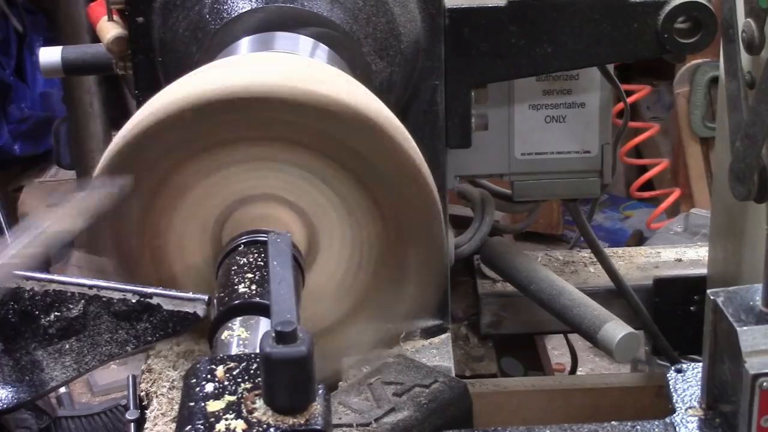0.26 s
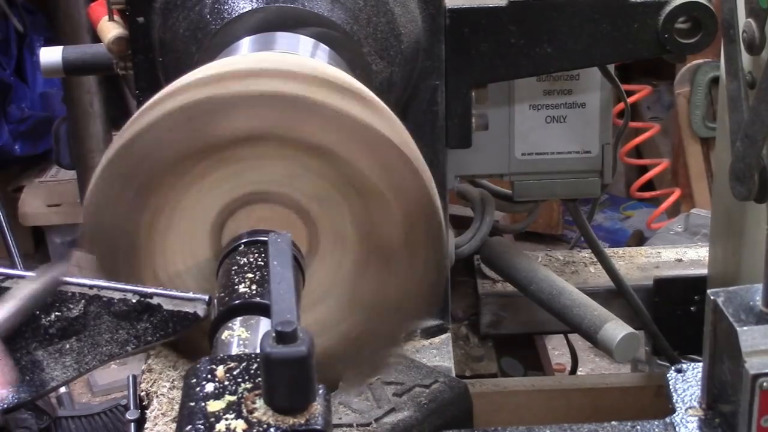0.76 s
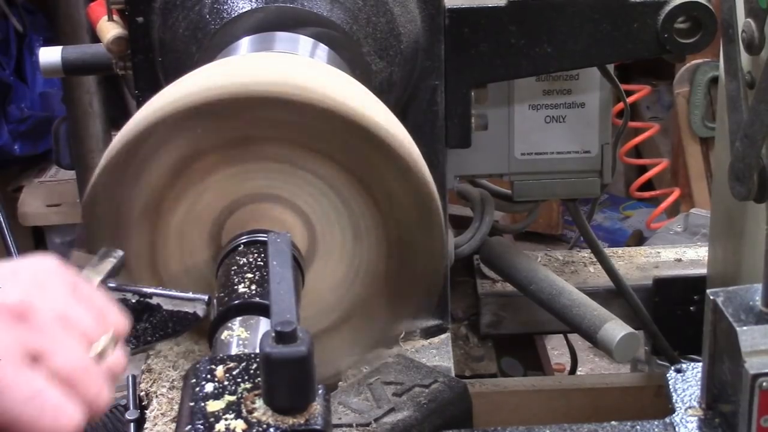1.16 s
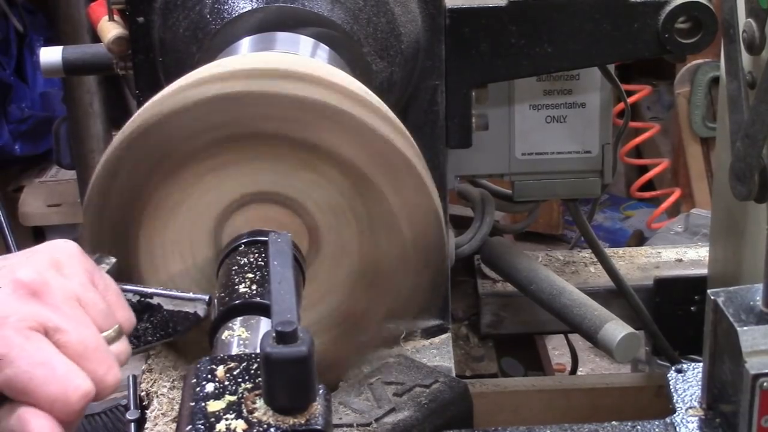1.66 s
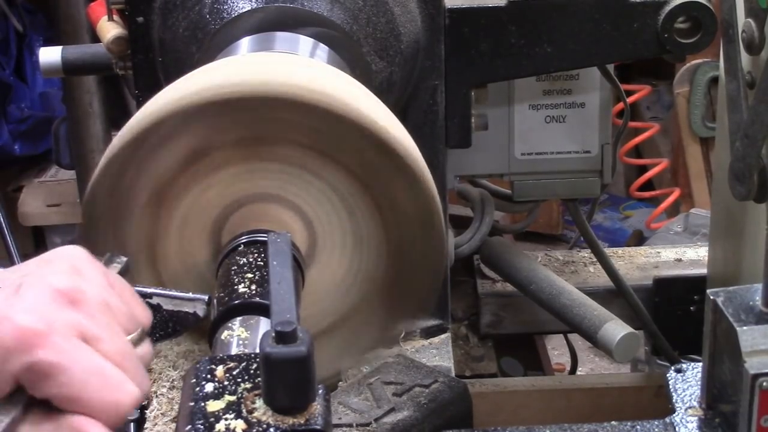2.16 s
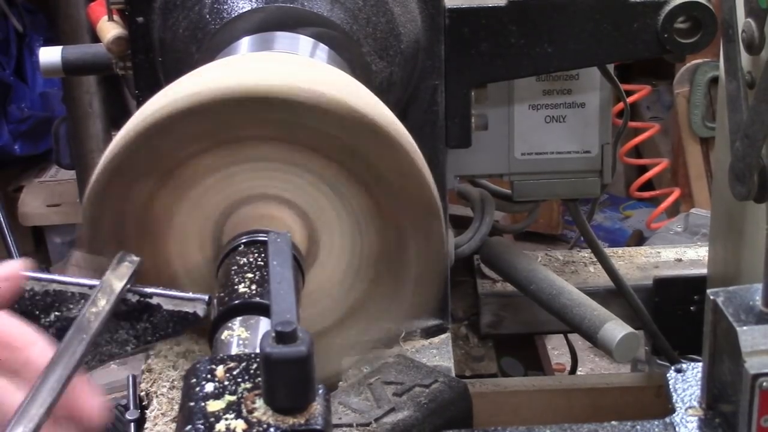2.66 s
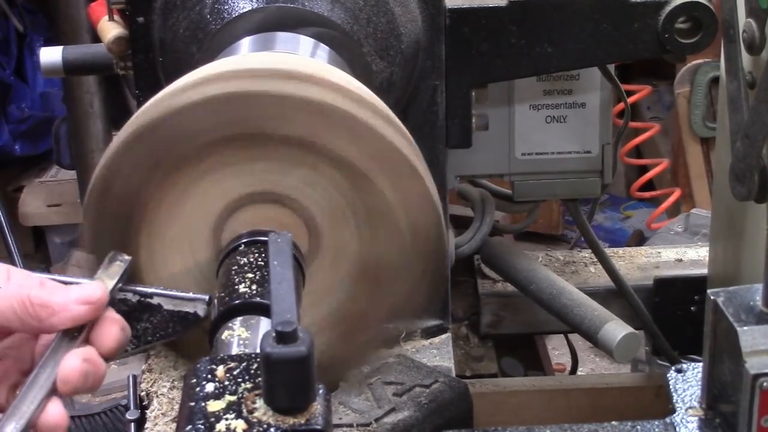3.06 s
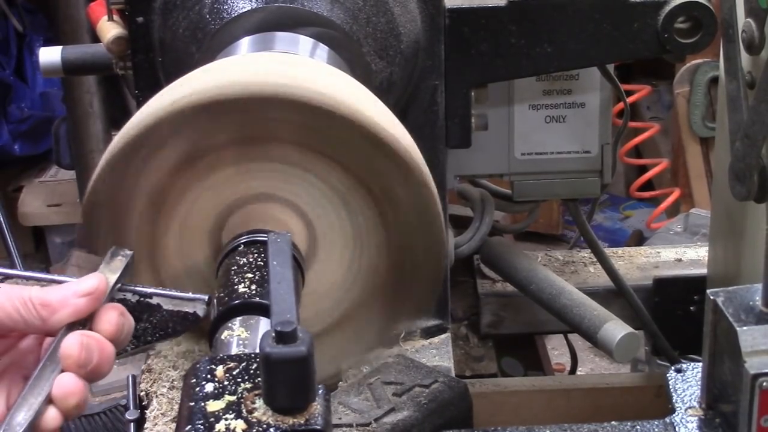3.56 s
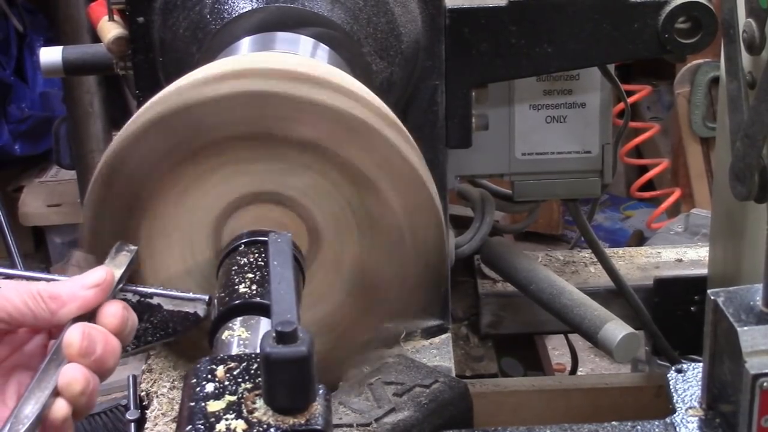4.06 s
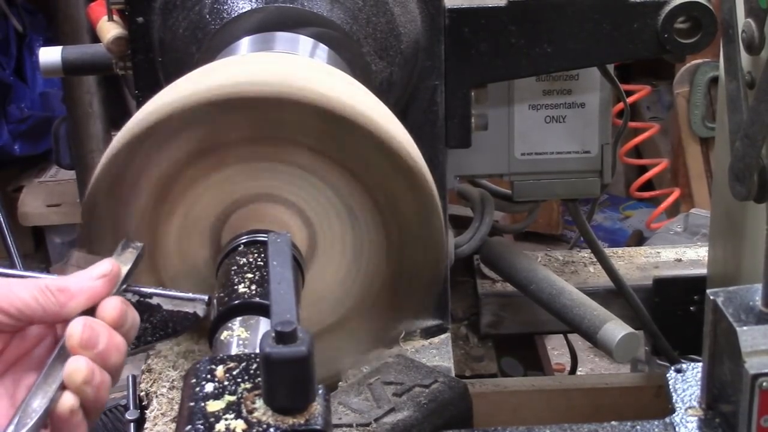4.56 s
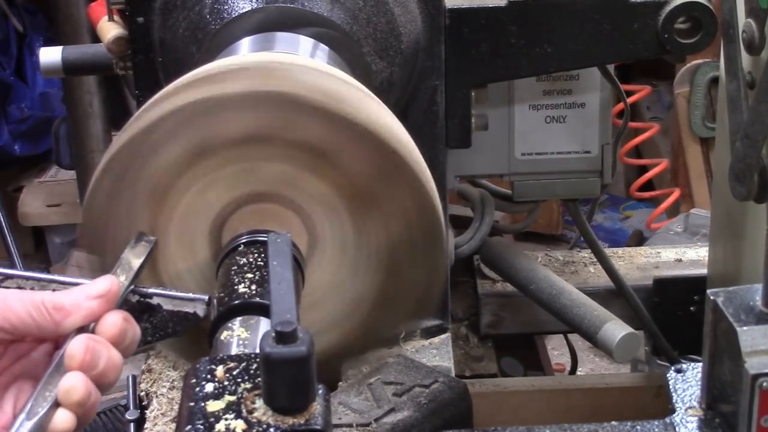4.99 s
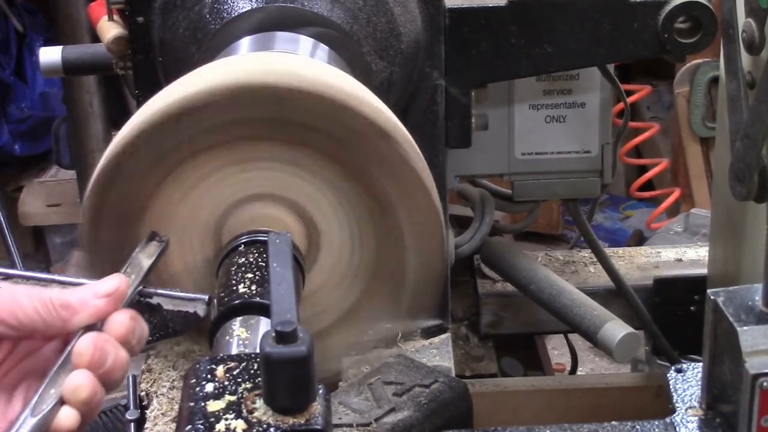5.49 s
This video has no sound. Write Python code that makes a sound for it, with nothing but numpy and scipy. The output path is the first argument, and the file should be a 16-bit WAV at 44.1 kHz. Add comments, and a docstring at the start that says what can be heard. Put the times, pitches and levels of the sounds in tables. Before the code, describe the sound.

A wood lathe runs at constant speed throughout, heard close in a small workshop with short, bright echoes. Its hum near 470 Hz beats quickly, with a faint buzzing whine around 10 kHz, a broad airy wash, and soft low thumps about eleven times a second, each trailed by loose metallic rattle. Soft cloth-like rustles come and go mainly in the first 2.6 s. At 1.4 s a steel gouge drops on the rest with a very loud, hard clack. From 2.65 to 2.9 s it slides with a short gritty metallic scrape; a very faint clack at 3.3 s precedes a clear ringing tap at 3.5 s. From 4.1 to 4.65 s, seven woody knocks come about 0.09 s apart, uneven in strength. After a pause, 5.14 to 5.65 s brings dense loud chatter, splintering and rough cutting, with a tiny falling squeal near 5.3 s, then the lathe alone.

```python
"""A wood lathe turns a rough blank in a workshop: motor hum with beats, inverter whine, one frame thump a turn.
A steel gouge is laid on the rest, slid and tapped, then meets the high spots of the blank and cuts briefly.
Steady tones make the motor; clicks and grit set off ringing modes for frame, steel and wood;
shaped noise makes the wash and rustle, and sparse echoes make the room."""
import sys
import numpy as np
from scipy import signal
from scipy.io import wavfile
from scipy.ndimage import uniform_filter1d

SR = 44100
rng = np.random.default_rng(int(sys.argv[2]) if len(sys.argv) > 2 else 0)


def waveform_to_disk(signal):
    """Save audio, clipped to [-1, 1], as 16-bit WAV at the path in sys.argv[1]."""
    frames = np.transpose(np.atleast_2d(signal))
    scaled = np.clip(frames, -1, 1) * 32767
    samples = np.round(scaled).astype(np.int16)
    wavfile.write(sys.argv[1], SR, samples)


N = 252693

SPINDLE_HZ, ROTOR_HZ = 11.0, 13.1
THUMP_TURN = 0.76  # where in the spindle turn the thump falls

# Gouge shaft modes: (frequency [Hz], level [dB], t60 [s])
GOUGE_MODES = [(690, -20, .06), (1007, -22, .08), (1425, -1, .12), (2480, -7, .05), (2525, 0, .12),
               (2635, -4, .12), (3920, -5, .08), (4090, -17, .1), (5470, -16, .07)]
# Countless small modes of bed and rest: (frequency [Hz], level [dB], t60 [s])
BED_BANDS = [(150, -46, .2), (320, -8, 0.59), (930, -1.5, 0.11), (2240, -7, 0.26), (4030, -16.5, 0.28),
             (6940, 5.5, 0.016), (8300, -12, 0.036), (15000, -7, 0.015)]
# Blank with the gouge against it: (frequency [Hz], level [dB], t60 [s])
BLANK_MODES = [(315.8, -2.5, 0.17), (400, 7.5, 0.11), (489.4, 4, 0.094), (591, 1.5, 0.072),
               (632, -6.5, 0.21), (689.7, 8.5, 0.072), (756, -9.5, 0.23), (884, 1.5, 0.067),
               (950, 0.5, 0.12), (1240, 6.5, 0.026)]
# Cutting edge modes: (frequency [Hz], level [dB], t60 [s])
EDGE_MODES = [(1150, -8, 0.016), (1880, 2, 0.02), (2180, 11.5, 0.0039), (2710, 13.5, 0.01),
              (3120, 5.5, 0.022), (2890, -19, 0.091), (3393, 9, 0.009), (5860, 17, 0.0017)]
# Splintering wood, too many modes to tell apart: (frequency [Hz], level [dB], t60 [s])
SPLINTER_BANDS = [(403, -22, 0.82), (1140, -1.5, 0.055), (1950, -10.5, 0.092), (2980, 6.5, 0.038),
                  (3780, -18, 0.078), (6050, -3.5, 0.0066), (8000, -27.5, 0.07), (11200, -24, 0.022),
                  (14100, -28.5, 0.02)]


def amp(db):
    """Decibels to amplitude factor."""
    return 10 ** (np.asarray(db) / 20)


def evened(x):
    """Scale to an RMS of one."""
    return x / np.sqrt(np.mean(x ** 2) + 1e-20)


def read(points, hz):
    """Read a (frequency, value) table along a log frequency axis."""
    f, value = np.transpose(points)
    return np.interp(np.log(hz + 1), np.log(f + 1), value)


def curve(rows, axis=1):
    """One column of a table at every sample; -150 outside its time span."""
    rows = np.array(rows)
    return np.interp(np.arange(N) / SR, rows[:, 0], rows[:, axis], -150, -150)


def ring(modes, shift=1, spread_db=0, rise=0.67):
    """Answer of an object to one click: sines that build over `rise` cycles and die; shift moves their pitch."""
    t = np.arange(SR // 3)[:, None] / SR
    hz, db, t60 = np.transpose(modes)
    swell = 1 - np.exp(-t * hz / max(rise, .01))
    decay = amp(db + spread_db - 60 * t / t60)
    return (swell * decay * np.sin(2 * np.pi * hz * shift * t)).sum(1)


def dense(bands, tilt_db=0):
    """Answer of a great many modes: noise dying band by band; tilt_db is dB an octave above 3 kHz."""
    f, db, t60 = np.transpose(bands)
    hz, t, z = signal.stft(rng.standard_normal(SR // 4), SR, nperseg=128)
    octaves = np.clip(np.log2(hz / 3000 + 1e-3), 0, 1.5)
    level_db = read(np.c_[f, db], hz) + tilt_db * octaves
    fade_db = -60 * t / read(np.c_[f, t60], hz)[:, None]
    return signal.istft(z * amp(level_db[:, None] + fade_db), SR, nperseg=128)[1]


def played(drive, modes, rise=0.62):
    """Ring an object's modes with a continuous drive signal."""
    return signal.oaconvolve(drive, ring(modes, rise=rise))[:N]


def bursts(rows, answers, size):
    """Each row (time [s], peak [dB], contact [s]): a clump of tiny impacts sets off that row's answer."""
    out = np.zeros(N)
    grits = rng.standard_normal((len(rows), size))
    for (s, db, contact), answer, grit in zip(rows, answers, grits):
        u = np.minimum(np.arange(size) / SR / max(contact, 3 / SR), 1)
        pressure = abs(np.sin(np.pi * u ** 0.8))
        sound = signal.oaconvolve(grit * abs(grit) * pressure, answer)
        part = out[round(s * SR):][:len(sound)]
        part += amp(db) * sound[:len(part)] / abs(sound).max()
    return out


def clicks(rows, answers):
    """Each row (time [s], peak [dB]): a two-sample click sets off that row's answer."""
    return bursts([(s, db, 0) for s, db in rows], answers, size=2)


def noise(spectrum, field_db, patchy_db):
    """Two alike channels of random short-time spectra with drifting patches."""
    # Left-right likeness: (frequency [Hz], correlation [-1..1])
    likeness = [(60, 0.7), (180, 0.98), (550, 0.99), (1650, 0.98), (4970, 0.9), (15000, 0.86)]
    frames, hz = N // 128 + 5, np.fft.rfftfreq(512, 1 / SR)
    a, b, c, d, patches = rng.standard_normal((frames, 257, 5)).T
    patches = uniform_filter1d(patches, size=8, axis=0)
    patches = evened(uniform_filter1d(patches, size=20, axis=1))
    same = np.clip(read(likeness, hz), -1, 1)[:, None]
    left = a + 1j * b
    right = same * left + np.sqrt(1 - same ** 2) * (c + 1j * d)
    z = np.array([left, right])
    z *= amp(read(spectrum, hz)[:, None] + patchy_db * patches)
    return amp(field_db) * evened(signal.istft(z, nperseg=512, noverlap=384)[1][:, :N])


def turn_since_thump():
    """Spindle position at every sample, in turns since the last thump."""
    return (np.arange(N) / SR * SPINDLE_HZ - THUMP_TURN) % 1


def motor_hum():
    """A motor tone whose partners, offset by rotor and spindle rates, make it beat."""
    hum_hz = 471.5
    # Hum over time: (time [s], level [dB])
    hum_level = [(0, -41), (1.6, -38.5), (3, -39), (4.4, -37), (5.73, -40.5)]
    # Partners of the hum: (offset [Hz], level re hum [dB], shaft angle at the start [turns])
    partners = [(ROTOR_HZ, -6.5, -0.14), (2 * ROTOR_HZ, -18.5, -0.066), (-2 * SPINDLE_HZ, -16, 0.068)]
    t = np.arange(N) / SR
    beat = 1 + sum(amp(db) * np.exp(2j * np.pi * (hz * t + turn)) for hz, db, turn in partners)
    waver = 1 + 0.087 * evened(uniform_filter1d(rng.standard_normal(N), size=2500))
    hum = amp(curve(hum_level)) * waver * (beat * np.exp(2j * np.pi * hum_hz * t)).real
    return np.sqrt(2) * hum


def inverter_whine():
    """A comb around the carrier; pairs of opposite sign make it buzz at four times the drive frequency."""
    carrier_hz, drive_hz = 10000.2, 26.27
    # Comb tones: (multiple of the drive frequency [count], level at start [dB], level at end [dB])
    comb = [(-19, -72, -72), (-15, -68, -68), (-13, -69, -69), (-7, -72, -72), (-5, -55, -66),
            (-3, -59, -58), (-1, -59, -59), (0, -68, -68), (1, -57, -57), (3, -54, -51), (5, -67, -67),
            (7, -73, -73), (11, -67, -67), (19, -71, -71), (21, -68, -68)]
    t = np.arange(N) / SR
    whine = np.zeros(N)
    for k, start_db, end_db in comb:
        sign = (-1) ** ((k + 5) // 4)
        level = amp(start_db + (end_db - start_db) * t / t[-1])
        whine += sign * level * np.cos(2 * np.pi * (carrier_hz + k * drive_hz) * t)
    return np.sqrt(2) * whine


def frame():
    """The unbalanced blank thumps once a turn; loose parts rattle just after and about each quarter turn."""
    # Lathe frame modes: (frequency [Hz], t60 [s], weight in thump [dB], weight in rattle [dB])
    frame_modes = [(156, 0.021, 16.5, -40), (235.6, 0.12, 2, -38), (768.4, 0.12, -38, -1),
                   (988, 0.073, -19, -4.5), (1280, 0.098, -27, -4), (1755, 0.052, -18, 3),
                   (1811, 0.055, -14.5, -3.5), (3454, 0.065, -21, -8.5), (4240, 0.045, -18.5, -38)]
    # Strength of the thumps: (time [s], level [dB])
    thump_level = [(0, -58), (.2, -48), (2.3, -47), (2.8, -49.5), (3.3, -45.5), (3.7, -47.5), (5.73, -48.5)]
    turn = turn_since_thump()
    push = (np.diff(turn, prepend=0) < 0) * rng.uniform(0.93, 1.0, N) * rng.choice([-1, 1], N)
    # each push is a click with a short rough tail
    rough = rng.standard_normal(60) * np.hanning(60) * 0.15 + signal.unit_impulse(60)
    push = signal.oaconvolve(push, rough)[:N]
    thump = evened(played(push, [(hz, db, t60) for hz, t60, db, _ in frame_modes], rise=1.26))
    shake = np.exp(-turn / .5) * np.exp(-(4.2 * turn % 1) / .25)
    ticks_per_s = 25 + 900 * shake
    ticks = (rng.random(N) < ticks_per_s / SR) * amp(4. * np.minimum(rng.exponential(1, N), 1.8))
    ticks *= rng.choice([-1, 1], N)
    rattle = evened(played(ticks, [(hz, db, t60) for hz, t60, _, db in frame_modes]))
    return thump * amp(curve(thump_level)) + amp(-45.5) * rattle


def slide():
    """Stick-slip grit rings the gouge shaft and, more dully, the bed as the gouge slides along the rest."""
    # Gouge slid along the rest: (time [s], level [dB])
    slide_level = [(2.64, -76), (2.705, -35), (2.735, -42), (2.79, -39), (2.82, -29), (2.88, -43),
                   (2.9, -52), (2.93, -57)]
    # the low modes are held down until the grip slips, then come up for at most 0.2 s
    slip_s, held_db, free_db_per_s = 2.8, -9, 240
    rub_db = -7  # share of the bed
    grit = rng.standard_normal(N) ** 3
    slide_db = curve(slide_level)
    free_db = held_db + free_db_per_s * np.clip(np.arange(N) / SR - slip_s, 0, .2)
    # fine grit favours the top modes
    high = evened(np.diff(played(grit, GOUGE_MODES[3:]), prepend=0)) * amp(slide_db)
    low = evened(played(grit, GOUGE_MODES[:3])) * amp(slide_db + free_db)
    rub = evened(signal.oaconvolve(grit, dense(BED_BANDS, -27.0))[:N]) * amp(slide_db + rub_db)
    return high + low + rub


def gouge_taps():
    """The gouge taps the rest: its shaft rings on until the grip tightens and damps it."""
    # Taps on the rest: (time [s], shaft peak [dB])
    tap_rows = [(2.703, -50), (3.496, -12.5)]
    bed_db = -13  # bed under the shaft
    grip_s, swell_db_per_s, damp_db_per_s = 0.026, 120, 1600
    t = np.arange(SR // 3) / SR
    shaft = ring(GOUGE_MODES[:-1], rise=4.)  # a blunt tap misses the top mode
    hand_db = swell_db_per_s * np.minimum(t, grip_s) - damp_db_per_s * np.maximum(t - grip_s, 0)
    held = shaft * amp(hand_db)
    taps = clicks(tap_rows, [held] * len(tap_rows))
    bed_rows = [(s, db + bed_db) for s, db in tap_rows]
    return taps + clicks(bed_rows, [dense(BED_BANDS, -13.0) for _ in tap_rows])


def clacks():
    """The gouge drops on the rest, which rings in its own modes over the dense answer of the bed."""
    # Gouge dropped on the rest: (time [s], rest peak [dB])
    clack_rows = [(1.381, -2.5), (3.3278, -34.5)]
    # Tool rest modes: (frequency [Hz], level [dB], t60 [s])
    rest_modes = [(320, -20, 0.27), (710, -34, 0.38), (950, -18, 0.28), (2360, -21, 0.056),
                  (3400, 7.5, 0.016), (4050, 7, 0.011), (5800, -2, 0.013), (6640, -2, 0.069),
                  (7700, -5, 0.017)]
    bed_db = -1  # bed under the rest
    rest = clicks(clack_rows, [ring(rest_modes)] * len(clack_rows))
    bed_rows = [(s, db + bed_db) for s, db in clack_rows]
    return rest + clicks(bed_rows, [dense(BED_BANDS) for _ in clack_rows])


def high_spots():
    """Each high spot chatters the edge, splinters, booms in the blank and shakes the stand."""
    # High spots hit the edge: (time [s], edge peak [dB], blank peak [dB], contact [s])
    hit_rows = [(4.1018, -22, -29, 0.0043), (4.187, -9, -6.5, 0.0074), (4.2791, -7.5, -6.5, 0.0059),
                (4.376, -19, -42, 0.0025), (4.462, -10, -13, 0.0071), (4.5526, -10.5, -11.5, 0.0077),
                (4.6409, -3.5, -6.5, 0.0072), (5.1386, -24, -28, 0.0046), (5.1814, -7.5, -20, 0.014),
                (5.1877, -3, -15.5, 0.014), (5.2172, -12, -42, 0.01), (5.221, -3, -33, 0.017),
                (5.272, -4, -25, 0.008), (5.3604, -4.5, -33, 0.019), (5.3693, -4, -37, 0.0088),
                (5.4144, -6.5, -16.5, 0.0035), (5.4688, -25, -19.5, 0.0047), (5.6506, -19, -28, 0.0036)]
    # The lathe's stand: (frequency [Hz], level [dB], t60 [s])
    stand_modes = [(136.4, 20.5, 0.26), (165.2, 6, 0.44)]
    s, edge_db, blank_db, contact = np.transpose(hit_rows)
    edge_rows = np.c_[s, edge_db, contact]

    # every hit detunes and reweights the modes a little
    chatter_draws = rng.standard_normal((len(s), 2, len(EDGE_MODES)))
    chatter = [ring(EDGE_MODES, 1 + 0.035 * a, 1.9 * b) for a, b in chatter_draws]
    edge = bursts(edge_rows, chatter, size=1000)

    tilts_db = -2.5 - 0.53 * edge_db - 0.29 * blank_db  # light, skimming touches are bright
    cracks = [dense(SPLINTER_BANDS, tilt) for tilt in tilts_db]
    edge += bursts(edge_rows, cracks, size=1000)

    boom_draws = rng.standard_normal((len(s), 2, len(BLANK_MODES)))
    booms = [ring(BLANK_MODES, 1 + .012 * a, 2.2 * b, rise=2.5) for a, b in boom_draws]
    boom = clicks(np.c_[s, blank_db], booms)

    stand_db = -25.5 + 1.1 * edge_db  # the stand grows slightly faster than the edge
    stand = clicks(np.c_[s, stand_db], [ring(stand_modes, rise=3.5)] * len(s))
    return edge + boom + stand


def cut():
    """While the edge stays in the wood, grit rubs the edge, the splintering fibres and the blank."""
    # Edge in the wood: (time [s], edge and splinter drive [dB], blank level [dB])
    cut_level = [(5.17, -47, -65), (5.192, -41, -23), (5.266, -39, -30.5), (5.28, -19, -58),
                 (5.3, -40.5, -44), (5.34, -24, -21), (5.378, -38.5, -24.5), (5.43, -25.5, -17),
                 (5.62, -66, -66)]
    edge_grit, blank_grit, splinter_grit = rng.standard_normal((3, N)) ** 3
    edge = 1.5 * evened(played(edge_grit, EDGE_MODES))
    splinter = evened(signal.oaconvolve(splinter_grit, dense(SPLINTER_BANDS))[:N])
    blank = evened(played(blank_grit, BLANK_MODES))
    return (edge + splinter) * amp(curve(cut_level)) + blank * amp(curve(cut_level, axis=2))


def squeal():
    """A fuzzy tone with a quickly wandering strength sinks in pitch as the edge digs in."""
    # Squeal: (time [s], pitch [Hz], level [dB])
    squeal_path = [(5.29, 2250, -44), (5.31, 2100, -27), (5.36, 1800, -24), (5.378, 1650, -40)]
    a, b = uniform_filter1d(rng.standard_normal((2, N)), size=150)
    phase = 2 * np.pi * np.cumsum(curve(squeal_path)) / SR
    tone = ((a + 1j * b) * np.exp(1j * phase)).real
    return evened(tone) * amp(curve(squeal_path, axis=2))


def wash():
    """Bearings, belt and fan: broad patchy noise that surges just after each thump."""
    # Bearings, belt and fan: (frequency [Hz], density [dB per Hz])
    wash_spectrum = [(30, -6), (60, -18), (100, -10.5), (150, 6.5), (230, -26), (320, -17), (420, 2),
                     (650, -7.5), (1250, -9), (2000, -12), (4500, -22.5), (8000, -26.5), (10200, -22.5),
                     (12500, -40.5), (15500, -41)]
    throb_db = -43 + 3.7 * np.exp(-turn_since_thump() / 0.45)
    return amp(throb_db) * noise(wash_spectrum, 0, patchy_db=3.0)


def rustle():
    """A soft patchy hiss that comes and goes, likely hands and sleeves on the move."""
    # Rustle over time: (time [s], level [dB])
    rustle_level = [(0, -45), (.1, -40.5), (.45, -47), (.56, -41.5), (.72, -48), (.87, -39.5), (1.05, -47),
                    (1.3, -44.5), (1.6, -59), (1.77, -48.5), (2.1, -49), (2.3, -54), (2.38, -43.5),
                    (2.63, -45.5), (3, -56), (4.7, -51.5), (4.85, -47), (5.73, -69)]
    # Cloth: (frequency [Hz], density [dB per Hz])
    cloth_spectrum = [(350, -45), (600, -64), (659, -2.5), (1210, -8.5), (1720, -7), (8990, -20),
                      (10200, -17), (15000, -32.5)]
    return noise(cloth_spectrum, curve(rustle_level), patchy_db=2.5)


def bench(x):
    """Quick bright echoes from nearby things, opposite in sign on the two sides."""
    k = np.arange(400)
    taps = np.diff(rng.standard_normal(400) * np.exp(-k / 31.0) * (k > 30))
    side = signal.oaconvolve(x, taps / np.linalg.norm(taps))[:N]
    return np.array([side, -side])


def shop(x):
    """Workshop reverb: sparse echoes of random sign, each band dying at its own speed."""
    # Workshop decay: (frequency [Hz], t60 [s])
    room_decay = [(150, .3), (500, .3), (2000, .26), (6000, .22), (14000, .14)]
    taps = np.zeros((2, SR // 2))
    at = np.arange(200, SR // 2 - 20, 20)
    at = at + rng.integers(0, 20, len(at))
    taps[:, at] = rng.choice([-1., 1.], len(at)) + .5 * rng.standard_normal((2, len(at)))
    hz, t, z = signal.stft(taps, SR, nperseg=256)
    fade = amp(-60 * t / read(room_decay, hz)[:, None])
    tail = signal.istft(z * fade, SR, nperseg=256)[1]
    return signal.fftconvolve(x[None], tail / np.linalg.norm(tail[0]), axes=1)[:, :N]


def scene():
    """Mix lathe, gouge and wood with the air noises, nearby echoes and the room."""
    knocks = frame()
    tool = slide() + gouge_taps() + clacks() + high_spots() + cut() + squeal()
    # tool, knocks and whine sit slightly to the right
    near = (tool + knocks) * amp([[-.4], [.4]]) + motor_hum() + inverter_whine() * amp([[-1.5], [1.5]])
    echoes = amp(-7.5) * bench(tool + knocks)
    far = amp(-13.5) * shop(tool) + amp(-13) * shop(knocks)
    return near + wash() + rustle() + echoes + far


def record(dry):
    """The microphone drops deep bass and top treble; the loudest peaks are rounded off; then the band limit."""
    low_cut_hz, droop_hz, band_limit_hz = 125, 13200, 16400
    thin = signal.sosfilt(signal.butter(3, low_cut_hz, "high", fs=SR, output="sos"), dry)
    thin = signal.sosfilt(signal.butter(4, droop_hz, fs=SR, output="sos"), thin)
    soft = np.sign(thin) * np.tanh(abs(thin) ** 3) ** (1 / 3)
    limit = signal.firwin(511, band_limit_hz, window=("kaiser", 9), fs=SR)
    return signal.oaconvolve(soft, limit[None], "same")


dry = scene()
out = record(dry)
waveform_to_disk(out)
```